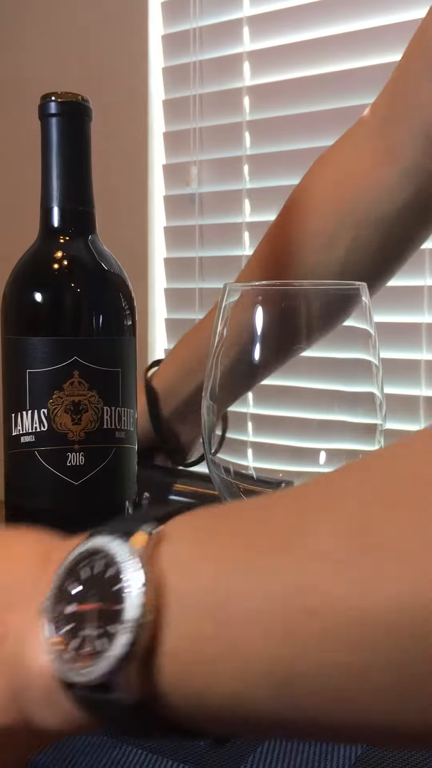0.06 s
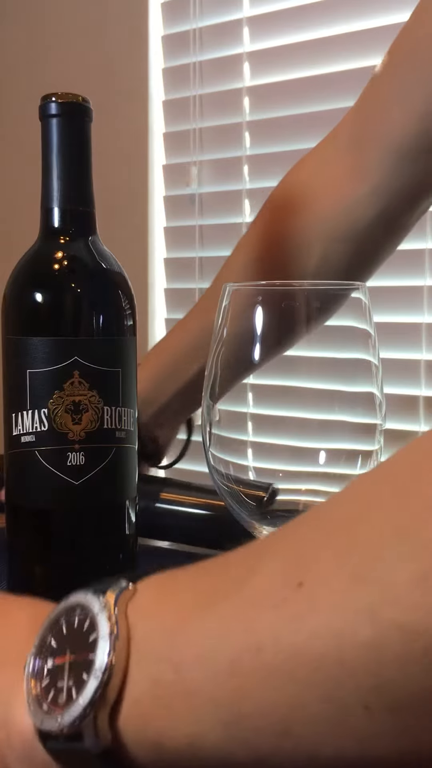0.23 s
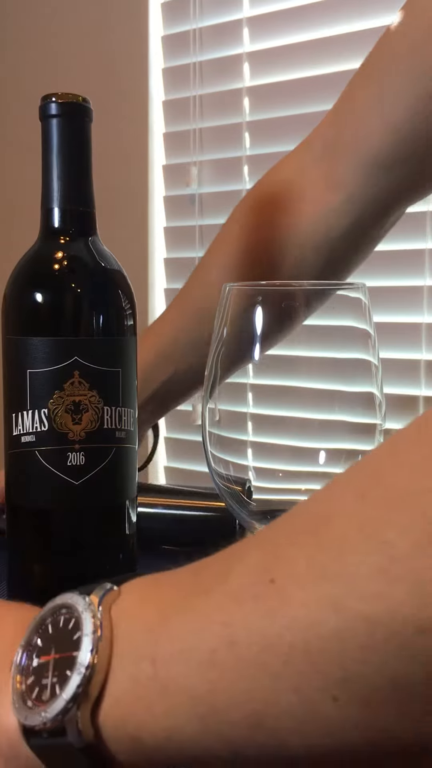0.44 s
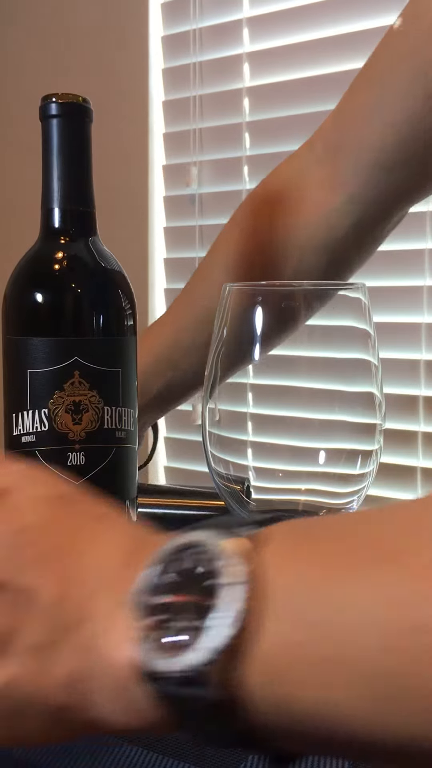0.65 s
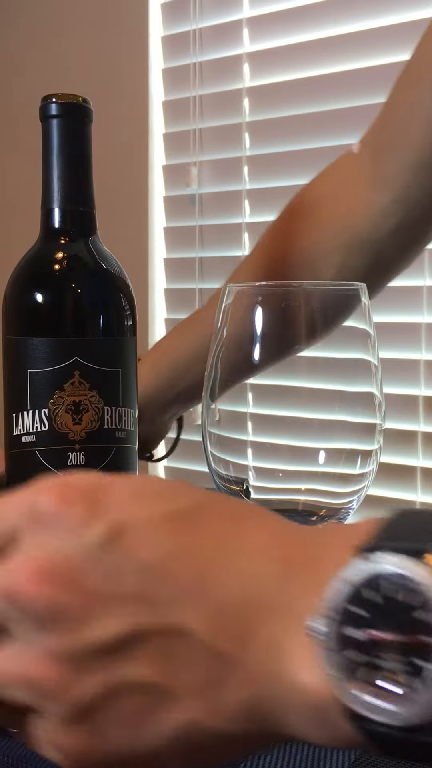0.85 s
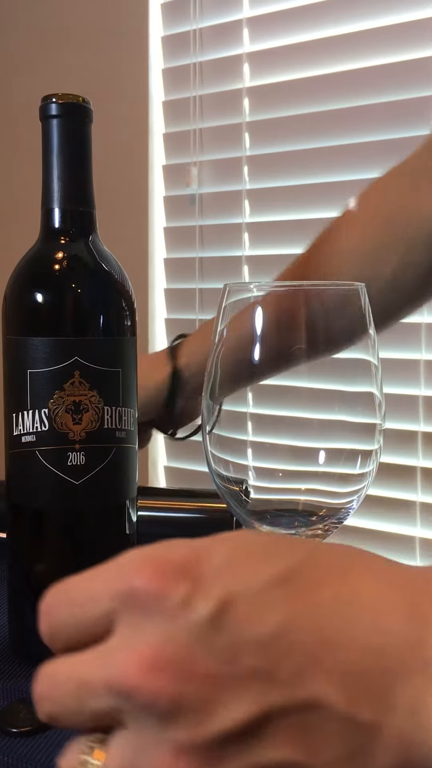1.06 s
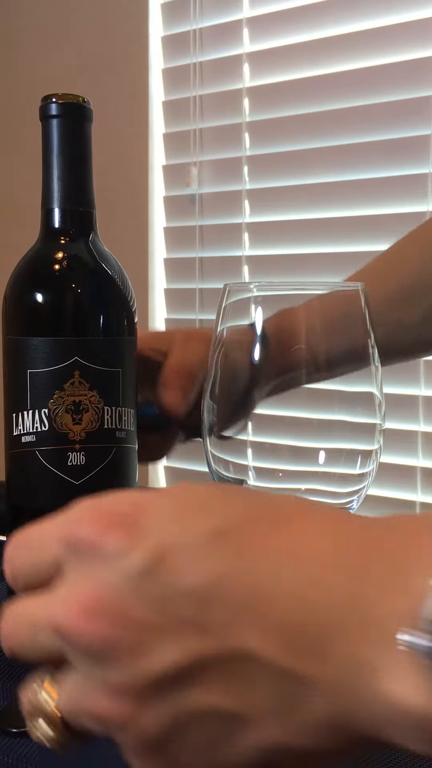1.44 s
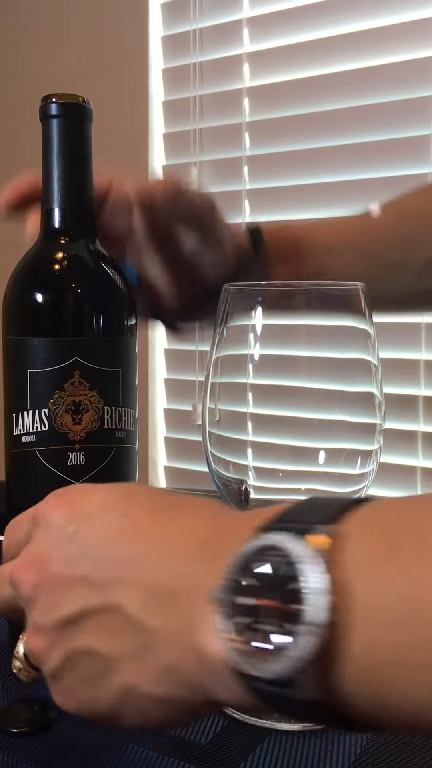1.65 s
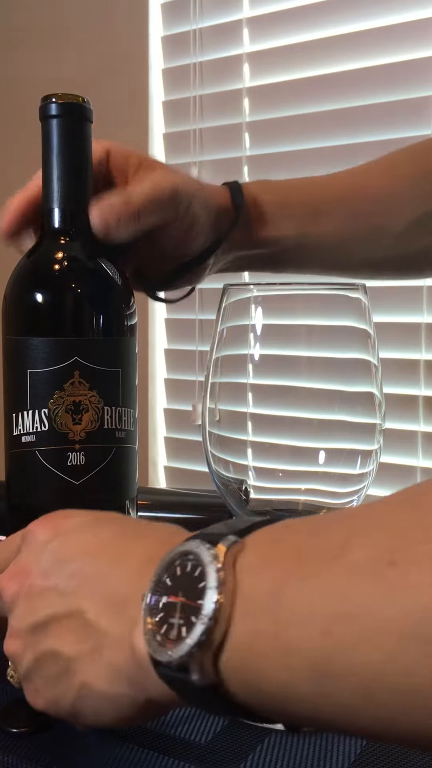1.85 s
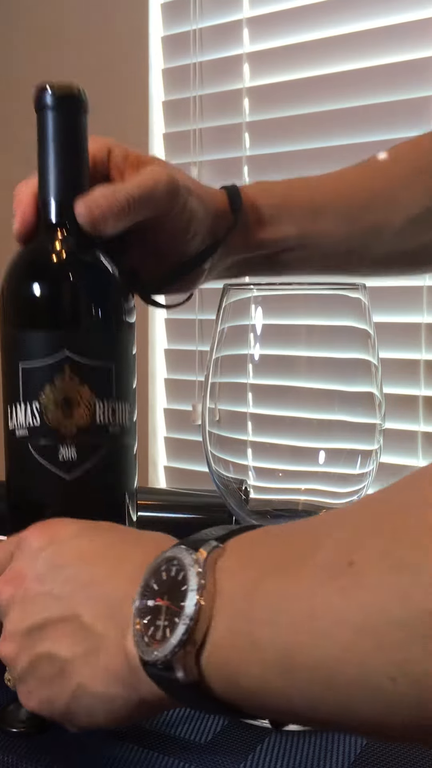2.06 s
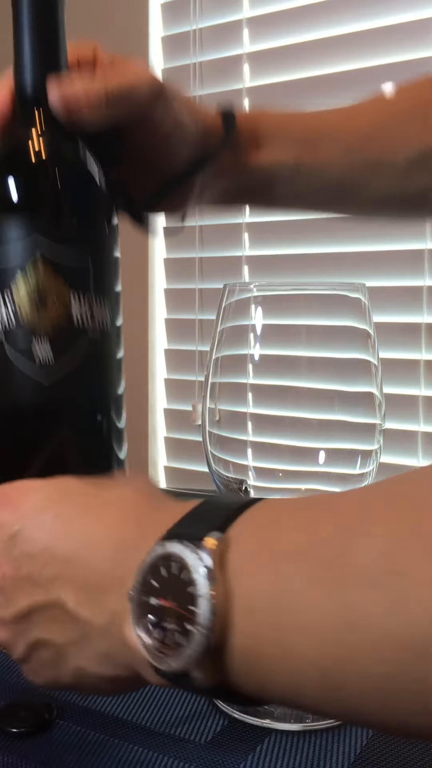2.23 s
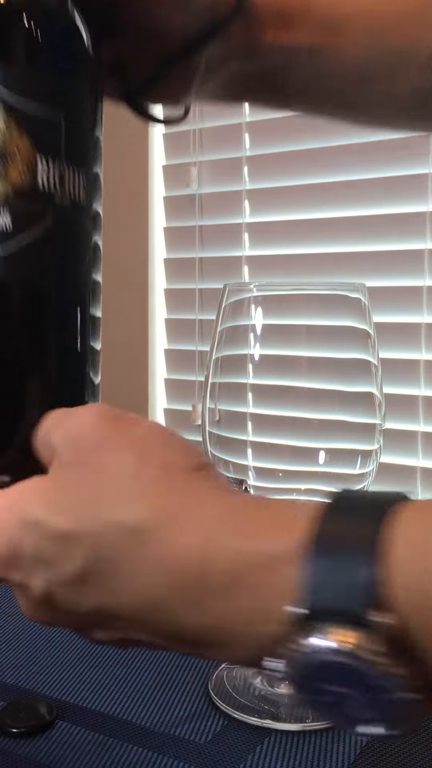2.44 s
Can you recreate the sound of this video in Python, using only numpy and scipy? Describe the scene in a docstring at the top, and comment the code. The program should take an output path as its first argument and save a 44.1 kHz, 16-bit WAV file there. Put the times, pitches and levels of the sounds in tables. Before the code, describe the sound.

In a quietly humming room, a bottle lands on a wooden table with a close, rattling thud, then ticks twice as it settles. After a pause, a bottle clinks lightly twice and is lifted with a faint swish.

```python
"""Bottle on a cloth-covered table

Close to the microphone, a bottle thuds onto a wooden table still ringing from an earlier bump.
It rocks on the cloth and settles with two ticks. Later a hand takes an upright bottle by the neck
with two small glass clinks and lifts it away with a faint swish. Behind, the small room hums quietly."""
import sys
import numpy as np
from scipy import signal
from scipy.fft import rfft, irfft, next_fast_len
from scipy.io import wavfile
from scipy.ndimage import map_coordinates

SR = 44100
rng = np.random.default_rng(int(sys.argv[2]) if len(sys.argv) > 2 else 0)


def wrap_up_sound(samples):
    """Save the sound to the file named by the first command line argument, as 16-bit audio."""
    columns = np.atleast_2d(samples).T
    # keep every value between -1 and 1, then stretch to whole-number steps
    tamed = np.clip(columns, -1, 1)
    steps = np.round(tamed * 32767).astype(np.int16)
    wavfile.write(sys.argv[1], SR, steps)


N = 114660
T = np.arange(SR) / SR  # one second for a strike to ring out

# Blows on the table. Each row: start in seconds, wood ring in dB, contact low-pass in Hz,
# then clatter, crack and bottle shell gains in dB.
TABLE_BLOWS = [(-.03, -11.5, 350, -10.5, -12, -31.5), (0.2145, 0, 2480, 3.5, 3, -26.5),
               (0.2341, -1, 385, -10.5, -16, -42), (.258, -4, 193, -11, -13, -38),
               (0.2766, 0, 615, -12.5, -22, -46)]
# Modes of the table top. Each row: frequency in Hz, gain in dB, t60 in seconds.
WOOD_MODES = [(92.1, -40.5, 0.84), (131.8, -27, 0.59), (184, -28.5, 0.26), (226, -29.5, 0.51),
              (265.6, -39.5, 0.73), (324, -20.5, 0.083), (364.9, -25, 0.57), (419.4, -31.5, 0.29),
              (515, -43, 0.51), (562, -26.5, 0.13), (644, -33.5, 0.18), (965, -27, 0.061),
              (1030, -39, 0.059), (2236, -25, 0.034)]
# Modes of the bottle's shell. Each row: frequency in Hz, gain in dB, t60 in seconds.
SHELL_MODES = [(1033, -9, 0.1), (1507, -21, 0.4), (1933, -33, 0.48), (2240, -14, 0.21), (2356, -23, .15),
               (2370, -31, .1), (3217, -20, .11), (5700, -29, 0.1), (5850, -21, 0.11)]
# Decay of the diffuse ring of table and room. Each row: frequency in Hz, t60 in seconds.
CLATTER_DECAY = [(100, 0.67), (500, 0.37), (2000, 0.4), (6000, 0.26), (14000, 0.08)]
# Thumps on the cloth. Each row: start in seconds, level in dB, pitch in Hz.
ROCK_THUMPS = [(.002, -32, 102.5), (.234, -23, 387.7), (0.2768, -24, 376.2), (.464, -35, 222.5),
               (.5, -38, 355), (0.56, -35, 141.5), (0.587, -35, 116), (.66, -41, 138), (2.061, -46.5, 133)]
# Settling ticks. Each row: start in seconds, then tick, shell and snap gains in dB.
SETTLING_TICKS = [(0.5598, -45, -41, -39), (0.659, -42, -42.5, -49)]
# Glass clinks. Each row: start in seconds, gain in dB, low-mode gain in dB, tilt in dB per octave.
NECK_CLINKS = [(2.0813, -37.5, -17.5, 2), (2.1224, -38, -0.5, -2.5)]
# Modes of the held glass. Each entry: frequency in Hz.
GLASS_MODE_HZ = [2750, 3400, 3690, 5130, 5420, 5720, 6290, 6750, 8400]
# Ring of those modes, in order. Each row: gain in dB, t60 in seconds.
GLASS_RING = [(-10, 0.01), (-9, 0.022), (-6.5, 0.027), (-5.5, 0.016), (-5, 0.024), (-1, 0.01), (-4, 0.013),
              (-6, .009), (-21, 0.016)]
# Sliding strokes. Each row: start and length in seconds, level in dB, bright band in Hz.
SLIDE_STROKES = [(-.1, 0.44, -58, 12800), (1.472, 0.25, -63, 11800), (1.832, 0.12, -61, 14200),
                 (1.928, 0.063, -57, 13700), (2.221, 0.33, -66, 14000)]
# Swishes. Each row: start and length in seconds, the glide's upper and lower pitch in Hz, level in dB.
SWISH_GLIDES = [(.07, .28, 10650, 9230, -71.5), (2.214, .38, 10400, 7670, -75)]
# Appliance hum. Each row: frequency in Hz, rms level in dB.
HUM_TONES = [(58.4, -51.5), (120, -70.5), (237, -67.5), (1596, -81), (2405, -83.5)]

# Noise colours. Each row: frequency in Hz, relative spectral density in dB.
CRACK_COLOUR = [(200, 1.5), (600, 4), (800, -17), (1000, 8), (1700, -14), (2300, 5), (3200, -13),
                (4200, -25), (5600, -14.5), (8000, -30), (11000, -21), (14500, -16.5), (16000, -39)]  # first contact of a blow
CLATTER_COLOUR = [(45, -9), (110, -5), (380, 4.5), (620, -9.5), (790, -4), (1000, -9.5), (1700, -18.5),
                  (2300, -17), (3600, -29), (5500, -32.5), (8000, -34), (14000, -25.5)]  # diffuse ring of table and room
ROLL_COLOUR = [(60, -29), (110, -10), (240, 3.5), (400, -1), (520, -10.5), (780, -15), (1100, -16.5),
               (1700, -23), (2300, -28), (4000, -40), (12000, -61)]  # bottle shifting on the cloth
TICK_COLOUR = [(300, 1.5), (750, -8.5), (1100, -4), (1900, -3), (2250, -0.5), (2700, -10), (3300, -4),
               (5000, -14.5), (9000, -16), (13000, -14), (16000, -22)]  # body of a tick
SNAP_COLOUR = [(700, 2), (1250, 9.5), (2200, -6), (5000, -15), (9000, -19), (13000, 1), (16000, -16)]
TOUCH_COLOUR = [(500, -8), (1500, 4), (3000, -1), (4200, -12), (5600, 1), (7600, -16), (16000, 7)]  # glass contact
SCRAPE_COLOUR = [(1000, 3), (2300, 2), (3500, -2.5), (6000, -6), (9000, -6.5), (15000, -11.5)]  # dragged bottle
SLIDE_COLOUR = [(2000, -7), (6000, -11), (9000, -6.5), (12000, -1.5), (15000, 1.5)]  # sliding hands and bottles
AIR_COLOUR = [(25, -15), (36, -24), (55, -7.5), (80, -18), (115, -12), (180, -15.5), (280, -17),
              (450, -25.5), (850, -33.5), (2000, -41), (3500, -39), (4900, -44), (8000, -43),
              (12000, -43.5), (15800, -42)]  # room air

CRACK_DB, CLATTER_DB, AIR_DB = -14, -28.5, -56
LOW_CUT_HZ, NOTCH_HZ = 77, 800  # the table radiates little below the first, and the sound dips around the second
LOW_GLASS_HZ, CLINK_ROOM_DB = 4300, -12
SWISH_RATIOS, SWISH_RISE, SWISH_RISE_S, SWISH_FLICKER_DB = [1, 1.19, 1.44, 1.62], .22, .035, 8
TOP_HZ = 15950


def thud():
    """Close up, each blow cracks on contact and rings the table, the room and the bottle."""
    out = np.zeros(N)
    for start, wood_db, contact_hz, clatter_db, crack_db, shell_db in TABLE_BLOWS:
        wood = amp(wood_db) * table_ring(contact_hz)
        diffuse = amp(CLATTER_DB + clatter_db) * clatter()
        crack = amp(CRACK_DB + crack_db) * burst(CRACK_COLOUR, t60=.017) * attack(.00093)
        add(out, start, wood + diffuse + crack + amp(shell_db) * shell_ring())
    out = signal.lfilter(*signal.butter(2, LOW_CUT_HZ, "high", fs=SR), out)
    return signal.lfilter(*signal.iirnotch(NOTCH_HZ, Q=4, fs=SR), out)


def table_ring(contact_hz):
    """The wooden top rings in its modes; a soft contact only reaches the low ones."""
    ring = np.zeros(SR)
    for k, (hz, db, t60) in enumerate(WOOD_MODES):
        reach = 1 / np.sqrt(1 + (hz / contact_hz) ** 4)
        ring += (-1) ** k * reach * mode(hz, db, t60)
    return ring * attack(.0008)


def shell_ring():
    """The struck bottle rings in its own modes."""
    return sum(mode(hz, db, t60) for hz, db, t60 in SHELL_MODES)


def clatter():
    """Dense ring of table and room: the treble dies first, a faint tail lingers."""
    hz, t, bands = signal.stft(noise(CLATTER_COLOUR, SR), SR, nperseg=256)
    early = fade(t, along(CLATTER_DECAY, hz)[:, None])
    tail = amp(-22) * fade(t, t60=.85)
    return signal.istft(bands * (early + tail), SR)[1][:SR] * attack(.0028)


def rocking():
    """The cloth cushions each rock of the bottle into a low thump, over a soft rolling rumble."""
    out = np.zeros(N)
    for start, db, hz in ROCK_THUMPS:
        add(out, start, mode(hz, db, t60=.21) * attack(.003))
    rumble = amp(-47.5) * swell(noise(ROLL_COLOUR, SR), seconds=.28)
    add(out, start=.28, sound=rumble)
    return out


def ticks():
    """The bottle settles with two light, hard contacts, each a snap that rings its shell."""
    out = np.zeros(N)
    decay = fade(T, t60=.013) + amp(-10) * fade(T, t60=.33)
    for start, tick_db, shell_db, snap_db in SETTLING_TICKS:
        tick = amp(tick_db) * noise(TICK_COLOUR, SR) * decay
        snap = amp(snap_db) * burst(SNAP_COLOUR, t60=.019)
        add(out, start, tick + snap + amp(shell_db) * shell_ring())
    return out


def clinks():
    """Hand-damped glass rings for a moment and the small room carries it on."""
    out = np.zeros(N)
    for start, db, low_db, tilt_db in NECK_CLINKS:
        ring = amp(-13) * burst(TOUCH_COLOUR, t60=.0072)
        for hz, (mode_db, t60) in zip(GLASS_MODE_HZ, GLASS_RING):
            colour_db = low_db * (hz < LOW_GLASS_HZ) + tilt_db * np.log2(hz / np.median(GLASS_MODE_HZ))
            ring += mode(hz, mode_db + colour_db + rng.normal(0, 1), t60, cycles=rng.random())
        room = rng.standard_normal(SR) * fade(T, t60=.26) * attack(.0055)
        reverb = signal.fftconvolve(ring, room / np.linalg.norm(room))[:SR]
        add(out, start, amp(db) * (ring + amp(CLINK_ROOM_DB) * reverb))
    return out


def sliding():
    """A bottle drags at the start; hands and bottles hiss, each stroke with its own bright band."""
    out = np.zeros(N)
    add(out, 0, amp(-51) * burst(SCRAPE_COLOUR, t60=.77))
    for start, length, db, hz in SLIDE_STROKES:
        hiss = noise(SLIDE_COLOUR, SR)
        bright = amp(-2) * signal.lfilter(*signal.iirpeak(hz, Q=32, fs=SR), hiss)
        add(out, start, amp(db) * swell(unit(hiss + bright), length))
    return out


def swishes():
    """Thin, high, flickering tones that rise quickly and sink as the movement slows."""
    out, t = np.zeros(N), np.arange(N) / SR
    rise = 1 - SWISH_RISE * np.exp(-t / SWISH_RISE_S)
    for start, length, upper_hz, lower_hz, db in SWISH_GLIDES:
        pitch = np.interp(t, [0, length], [upper_hz, lower_hz]) * rise
        gate = np.clip(np.minimum(t, length - t) / .035, 0, 1)
        for ratio in SWISH_RATIOS:
            hz = ratio * pitch * (1 + .016 * wobble(9.2) + .0078 * wobble(900))  # wander and jitter
            flicker_db = SWISH_FLICKER_DB * np.tanh(wobble(39.2))
            add(out, start, amp(db + flicker_db) * gate * np.sin(2 * np.pi * np.cumsum(hz) / SR))
    return out


def room_tone():
    """Quiet air and a steady appliance hum in the background."""
    t = np.arange(N) / SR
    hum = sum(amp(db) * np.sqrt(2) * np.sin(2 * np.pi * hz * t + .08 * wobble(7.1))
              for hz, db in HUM_TONES)
    return amp(AIR_DB) * noise(AIR_COLOUR, N) + hum


def amp(db):
    """Decibels to amplitude."""
    return 10 ** (np.asarray(db) / 20)


def unit(x):
    """Scale to rms 1."""
    return x / np.sqrt(np.mean(x ** 2) + 1e-20)


def along(points, hz):
    """Interpolate (Hz, value) points on a log frequency axis."""
    point_hz, values = np.transpose(points)
    return np.interp(np.log(hz + 1), np.log(point_hz + 1), values)


def fade(t, t60):
    """Decay by 60 dB every t60 seconds."""
    return amp(-60 * t / t60)


def attack(seconds):
    """Onset with this time constant."""
    return 1 - np.exp(-T / seconds)


def swell(sound, seconds):
    """Cut to length and ease in and out."""
    size = int(seconds * SR)
    return sound[:size] * signal.windows.tukey(size, .5)


def mode(hz, db, t60, cycles=0):
    """A decaying sine, its phase in cycles."""
    return amp(db) * fade(T, t60) * np.sin(2 * np.pi * (hz * T + cycles))


def noise(colour, size):
    """Coloured noise of rms 1."""
    gain = amp(along(colour, np.fft.rfftfreq(size, 1 / SR)))
    return unit(irfft(rfft(rng.standard_normal(size)) * gain, size))


def burst(colour, t60):
    """Decaying coloured noise."""
    return noise(colour, SR) * fade(T, t60)


def wobble(rate):
    """A smooth random curve, rate knots a second."""
    knots = rng.standard_normal(int(N * rate / SR) + 4)
    return map_coordinates(knots, [np.arange(N) * rate / SR])


def add(out, start, sound):
    """Mix sound into out from start seconds."""
    i = round(start * SR)
    sound = sound[max(-i, 0):max(N - i, 0)]
    out[max(i, 0):][:len(sound)] += sound


def scene():
    """Everything from one microphone at the table's edge."""
    return (thud() + rocking() + ticks() + clinks() + sliding() + swishes() + room_tone())[None]


def record(dry):
    """The recorder keeps nothing above its band limit."""
    size = next_fast_len(N + SR // 2)
    passband = np.fft.rfftfreq(size, 1 / SR) < TOP_HZ
    return irfft(rfft(dry, size) * passband, size)[..., :N]


dry = scene()
out = record(dry)
wrap_up_sound(out)
```